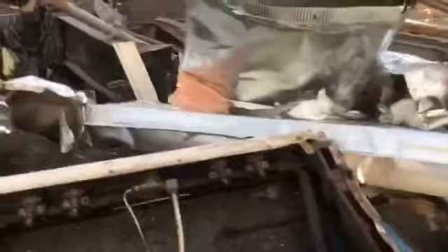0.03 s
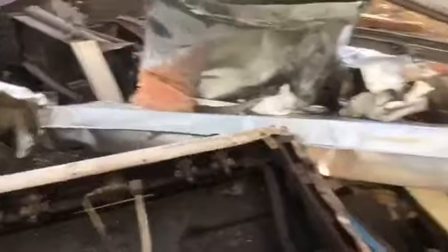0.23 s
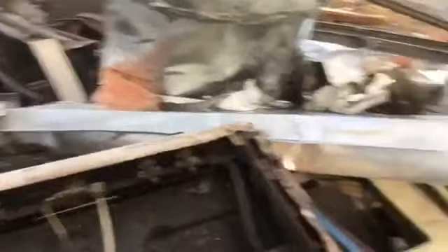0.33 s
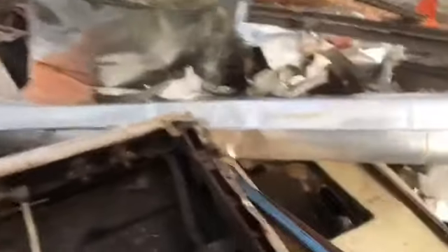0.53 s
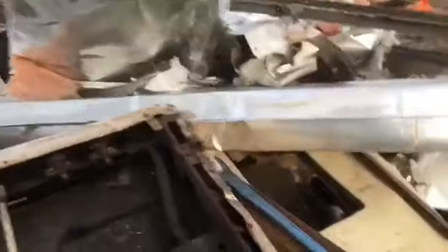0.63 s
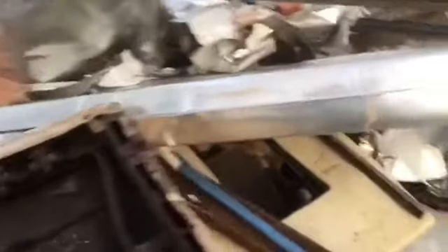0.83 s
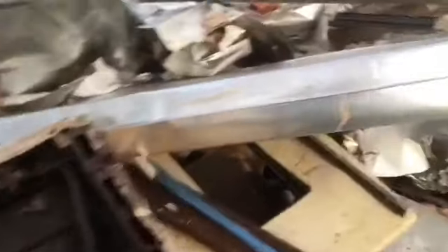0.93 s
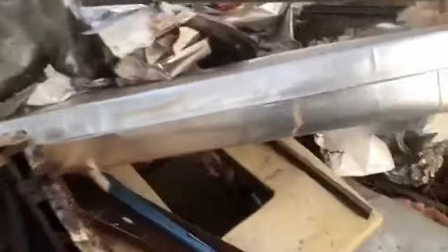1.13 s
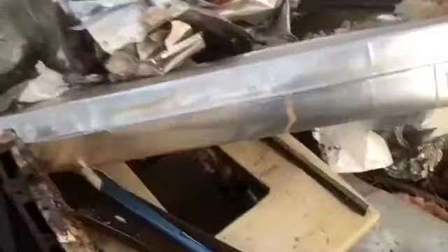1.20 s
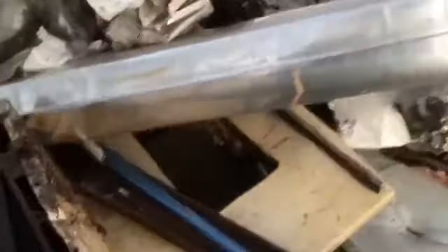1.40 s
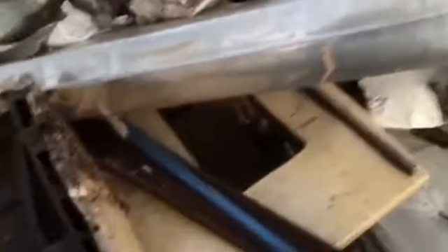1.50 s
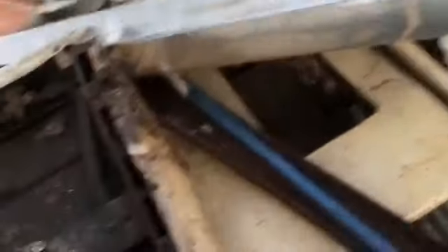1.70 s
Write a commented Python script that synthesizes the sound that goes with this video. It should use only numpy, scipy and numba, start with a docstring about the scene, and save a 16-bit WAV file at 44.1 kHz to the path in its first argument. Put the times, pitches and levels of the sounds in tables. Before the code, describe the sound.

Sheet-metal scrap hits a heap with a loud, hollow crash at about 0.2 seconds and bounces twice by 0.5. It slides with a quieter grinding scrape until 0.8, then clatters and thuds again, settling with faint ticks by 1.3 seconds. A slight yard echo follows the hits, over a low, distant machinery drone. From 1.4 seconds, wind gusts rumble on the microphone, joined by a very faint metal squeal.

```python
"""Sheet-metal scrap drops on a heap in an open yard: it lands, bounces twice, slides, clatters and settles.
Each impact excites the same hollow panel, whose free vibration is a sum of damped modes, a few strong
among many dense ones. Flexing adds dull thuds, small pieces tick, and stick-slip friction makes the
slide grind. The yard returns a diffuse echo. Underneath are the drone of distant machinery, a faint
squeal of metal and low gusts on the microphone."""
import sys
import numpy as np
from scipy import signal
from scipy.fft import rfft, irfft
from scipy.io import wavfile
from scipy.ndimage import uniform_filter1d
from numba import njit

SR = 44100
rng = np.random.default_rng(int(sys.argv[2]) if len(sys.argv) > 2 else 0)


def transcribe(u):
    """Save the signal u as a 16-bit wav file named by the first command-line argument.

    u: samples, shape (n,) or (channels, n), limited to [-1, 1]; the rate is SR.
    q: integer samples, one column per channel.
    """
    v = np.clip(np.atleast_2d(u).T, -1, 1)
    q = np.round(v * 32767).astype(np.int16)
    wavfile.write(sys.argv[1], SR, q)


N = 77175

# Impacts on the panel. Each row: start in seconds, level in dB, boom, clang, crack and sizzle in dB
# relative to the body, factor on the ring time, favoured frequency in Hz, its lift in dB.
BLOWS = [(.2245, 0, 1.5, 2.5, 2.5, -3, 0.85, 807, 10.5), (.243, -3, 4, 4.5, -1, 1.5, 1.17, 790, 4.5),
         (.369, -13.5, 5, 8, 9.5, 5.5, 0.84, 990, 0.5), (.402, -22, -14, 8.5, 12, -2, 0.64, 1400, 2),
         (.445, -10, 3.5, 8.5, 5.5, 0, 0.79, 608, 14), (.464, -6.5, 1, -3.5, -25, -7, 0.64, 1355, 7),
         (.828, -10, 3, 1, 11, 7, 1.05, 1410, 5), (0.851, -11, 6, 2.5, 5, 9, 0.56, 902, 8),
         (0.899, -15.5, -9, 3, -9, 4, 0.37, 890, -1), (0.9348, -3, -0.5, 7, 2, -9, 0.71, 1860, 1)]
BOOM_HZ, BODY_HZ, CLANG_HZ, CRACK_HZ, SIZZLE_HZ = 304, 863, 1970, 6500, 12000
# Strong modes of the panel. Each row: frequency in Hz, relative level in dB.
STRONG_MODES = [(192, -11.5), (243, -9), (272, -4.5), (296, -7), (313, 0), (338, -6), (385, -8),
                (412, -9.5), (662, -4), (785, -2), (818, -5.5), (908, 0.5), (1066, -12.5), (1158, -4),
                (1380, -3.5), (1575, -6.5), (1675, -6), (1752, -14), (1909, -10), (1995, -12),
                (3020, -15.5), (3950, -20)]
# Damping of the strong modes. Each row: frequency in Hz, nominal time to fall 60 dB in seconds.
STRONG_T60 = [(190, 0.55), (310, 0.35), (420, 0.35), (800, 0.18), (1400, 0.25), (2000, .22), (4000, 0.1)]
# Spectral envelope of the dense modes. Each row: frequency in Hz, relative level in dB.
DENSE_SPECTRUM = [(120, -9), (290, -0.5), (480, -5.5), (850, -3.5), (1700, -6), (2400, -17), (3300, -21),
                  (5000, -32), (8000, -35), (12000, -40.5), (16000, -57)]
# Damping of the dense modes. Each row: frequency in Hz, nominal time to fall 60 dB in seconds.
DENSE_T60 = [(200, 0.67), (800, 0.38), (2000, 0.26), (5000, 0.21), (14000, 0.13)]
# Spectrum of the contact noise. Each row: frequency in Hz, relative level in dB.
CONTACT_SPECTRUM = [(500, -1), (1800, 0), (4000, -5.5), (8000, -7.5), (16000, -26.5)]
STRONG_DB, DENSE_DB, CONTACT_DB = -15.5, -11.5, -29.5  # balance within a blow

# Knocks of the flexing panel. Each row: start in seconds, level in dB, pitch in Hz, T60 in seconds.
THUDS = [(0.243, -18, 81, 0.19), (0.276, -9.5, 283, 0.21), (.322, -11.5, 310.2, 0.16),
         (0.378, -27, 96, 0.12), (0.569, -27, 70, 0.037), (.668, -20.5, 56.3, .1), (.882, -8.5, 69.6, .11),
         (0.919, -5, 312.7, 0.064), (1.167, -18, 67.2, 0.095), (1.17, -23.5, 177, 0.097)]
# Touches of small pieces. Each row: start in seconds, level in dB.
TICKS = [(.305, -35), (0.337, -40.5), (.535, -48.5), (1.05, -48.5), (1.118, -54.5), (1.167, -51.5),
         (1.221, -56), (1.285, -58.5)]
# Spectrum of a tick. Each row: frequency in Hz, relative level in dB.
TICK_SPECTRUM = [(1000, 10), (3300, 5), (4000, 2.5), (5000, -4.5), (6200, 2), (7500, -10), (9000, -11),
                 (11500, -18), (15000, -34)]
# Course of the slide. Each row: time in seconds, level of the grind in dB, level of the rasp in dB.
SLIDE_LEVELS = [(.5, -35, -50.5), (.605, -34, -50.5), (.65, -36.5, -60), (.71, -35, -52.5),
                (0.749, -35.5, -46), (0.798, -37, -49), (.825, -45, -54)]
# Spectrum of the grind. Each row: frequency in Hz, relative level in dB.
GRIND_SPECTRUM = [(300, 8), (900, -1), (1500, 4.5), (2500, -10.5), (3900, -26), (5000, -26), (9000, -34),
                  (15000, -52)]
# Spectrum of the edge's rasp. Each row: frequency in Hz, relative level in dB.
RASP_SPECTRUM = [(500, -15), (2200, 1.5), (3000, -0.5), (3900, -2.5), (4900, -19), (9000, -35),
                 (15000, -52)]

# Reverberation of the yard. Each row: frequency in Hz, time to fall 60 dB in seconds.
YARD_T60 = [(100, 1.5), (330, 1.174), (600, 0.92), (1400, 0.37), (2500, 0.53), (6000, 0.34), (14000, 0.36)]
# Spectrum of the machinery. Each row: frequency in Hz, relative level in dB.
DRONE_SPECTRUM = [(22, -32), (50, 6), (110, 0.5), (250, -7.5), (500, -13.5), (1000, -15.5), (1700, -25),
                  (2500, -35.5), (4000, -48.5), (6000, -53), (15000, -60)]
# Course of the squeal. Each row: time in seconds, level in dB.
SQUEAL_LEVELS = [(0, -59.5), (.05, -67), (.12, -71), (1.5, -86), (1.66, -66.5), (1.72, -60.5), (1.75, -61)]
# Resonances of the squealing metal. Each row: frequency in Hz, relative level in dB.
SQUEAL_SPECTRUM = [(1000, -30), (2150, -1), (2320, 6.5), (2500, -10), (2850, -1), (3020, 4), (3250, -23),
                   (5000, -29.5), (12000, -52)]
# Course of the gusts. Each row: time in seconds, level in dB.
GUST_LEVELS = [(0, -40), (.3, -38), (.65, -33.5), (.8, -39), (1.0, -29.5), (1.12, -55), (1.38, -63),
               (1.445, -21), (1.48, -33.5), (1.53, -28), (1.58, -48.5), (1.66, -26.5), (1.7, -31),
               (1.75, -19.5)]
# Spectrum of the gusts. Each row: frequency in Hz, relative level in dB.
GUST_SPECTRUM = [(20, -26), (38, -15.5), (55, -7.5), (85, -8), (140, -15), (260, -50), (800, -45),
                 (3000, -81)]


def panel(dense_count=640, spread_s=0.0021, band_ratio=1.096):
    """Impact excitation: a contact crack and free vibration, coloured by where and how hard it hits."""
    out = np.zeros(N)
    strong_hz, strong_db = np.array(STRONG_MODES, float).T
    place = (np.arange(dense_count) + rng.random(dense_count)) / dense_count
    dense_hz = 120 + 5000 * place + 11000 * place ** 3
    dense_gain = undb(at(DENSE_SPECTRUM, dense_hz)) * np.sqrt(np.gradient(dense_hz))
    dense_gain *= undb(DENSE_DB) / np.sqrt(np.sum(dense_gain ** 2) / 2)
    build = rise(spread_s)  # bending waves take a moment to spread through the sheet
    for start, level_db, boom, clang, crack, sizzle, length, favoured_hz, lift_db in BLOWS:
        strong = strike(strong_hz, undb(strong_db + STRONG_DB), at(STRONG_T60, strong_hz) * length)
        dense = strike(dense_hz, dense_gain, at(DENSE_T60, dense_hz) * length)
        band = [(favoured_hz / band_ratio, 0), (favoured_hz, lift_db), (favoured_hz * band_ratio, 0)]
        sheet = build * colour(strong + dense, band)
        contact = undb(CONTACT_DB) * noise(CONTACT_SPECTRUM) * fade(t60=0.047)
        tone = [(BOOM_HZ, boom), (BODY_HZ, 0), (CLANG_HZ, clang),
                (CRACK_HZ, crack), (SIZZLE_HZ, sizzle)]
        add(out, start, undb(level_db) * colour(sheet + contact, tone))
    return out


def strike(hz, gain, t60, detune=0.00701, scatter_db=1.5):
    """Modal response: a random striking point weights the modes, and changing support detunes them."""
    shift, scatter = rng.standard_normal((2, len(hz)))
    tuned_hz = hz * (1 + detune * shift)
    poles = np.exp((2j * np.pi * tuned_hz - np.log(1000) / t60) / SR)
    phases = np.exp(2j * np.pi * rng.random(len(hz)))
    return ring(poles, gain * undb(scatter_db * scatter) * phases, N)


@njit
def ring(poles, weights, count):
    """Superposition: damped sinusoids add, each followed until it has fallen about 70 dB."""
    out = np.zeros(count)
    for k in range(len(poles)):
        phasor, pole = weights[k], poles[k]
        for i in range(min(count, int(-8 / np.log(abs(pole))))):
            out[i] += phasor.imag
            phasor *= pole
    return out


def thuds():
    """Damped oscillation: each flexure of the panel sounds one low, quickly dying sinusoid."""
    out, t = np.zeros(N), np.arange(N) / SR
    for start, db, hz, t60 in THUDS:
        add(out, start, undb(db) * np.sin(2 * np.pi * hz * t) * fade(t60) * rise(tau_s=0.004))
    return out


def ticks():
    """Brief contacts have broad spectra: small settling pieces give bright bursts of noise."""
    out = np.zeros(N)
    for start, db in TICKS:
        add(out, start, undb(db) * noise(TICK_SPECTRUM) * fade(t60=0.14))
    return out


def slide(slips_per_s=790, scatter_db=3, slip_t60_s=0.043):
    """Stick-slip friction: an edge drags over the heap in dense bursts, rasping more before it drops."""
    t = np.arange(N) / SR
    slips = (rng.random(N) < slips_per_s / SR) * undb(scatter_db * rng.standard_normal(N))
    bursts = signal.fftconvolve(slips, fade(slip_t60_s))[:N]
    grit = unit(uniform_filter1d(bursts, size=64))
    rows = np.array(SLIDE_LEVELS)
    touching = uniform_filter1d(1. * ((t > rows[0, 0]) & (t < rows[-1, 0])), size=400)
    grind = noise(GRIND_SPECTRUM) * curve(rows[:, [0, 1]])
    rasp = noise(RASP_SPECTRUM) * curve(rows[:, [0, 2]])
    return grit * touching * (grind + rasp)


def yard(x, echo_db=-15, onset_s=0.023):
    """Reverberation: heaps and walls return a diffuse echo in which the bass outlasts the treble."""
    spectrum = rfft(rng.standard_normal(N))
    octave = np.log2(np.maximum(np.arange(len(spectrum)) * SR / N, 1))
    tail = np.zeros(N)
    for k in range(6, 15):  # octave bands from 64 Hz upward
        band = irfft(spectrum * np.maximum(1 - abs(octave - k), 0), N)
        tail += band * fade(at(YARD_T60, 2. ** k))
    tail *= rise(onset_s)
    return undb(echo_db) * signal.fftconvolve(x, tail / np.sqrt(np.sum(tail ** 2)))[:N]


def machinery(level_db=-41.5):
    """Stationary noise: distant machines merge into a low drone."""
    return undb(level_db) * noise(DRONE_SPECTRUM)


def squeal():
    """Resonance: far-off metal squeals faintly in two narrow bands of noise."""
    return curve(SQUEAL_LEVELS) * noise(SQUEAL_SPECTRUM)


def gusts():
    """Turbulence: the fluctuating pressure of wind on the microphone gives a low rumble."""
    return curve(GUST_LEVELS) * noise(GUST_SPECTRUM)


def undb(db):
    """Amplitude ratio of a level in decibels."""
    return 10 ** (np.asarray(db) / 20)


def at(points, hz):
    """Interpolation of (Hz, value) points on a logarithmic frequency axis."""
    freqs, values = np.array(points, float).T
    return np.interp(np.log(np.maximum(hz, 1)), np.log(freqs), values)


def curve(points):
    """Amplitude envelope through (seconds, dB) points."""
    return undb(np.interp(np.arange(N) / SR, *np.array(points, float).T))


def colour(x, points, size=2 ** 13):
    """Minimum-phase filtering: folding the cepstrum makes the (Hz, dB) response causal."""
    hz = np.arange(size // 2 + 1) * SR / size
    cepstrum = irfft(np.log(undb(at(points, hz))))
    cepstrum[1:size // 2] *= 2
    cepstrum[size // 2 + 1:] = 0
    return signal.fftconvolve(x, irfft(np.exp(rfft(cepstrum))))[:len(x)]


def unit(x):
    """Normalisation to an rms of 1."""
    return x / np.sqrt(np.mean(x ** 2))


def noise(points):
    """Spectral shaping: white noise takes on a (Hz, dB) spectrum, at an rms of 1."""
    spectrum = rfft(rng.standard_normal(N))
    hz = np.arange(len(spectrum)) * SR / N
    return unit(irfft(spectrum * undb(at(points, hz)), N))


def rise(tau_s):
    """Exponential approach to 1 with time constant tau_s."""
    return 1 - np.exp(-np.arange(N) / SR / tau_s)


def fade(t60):
    """Exponential decay by 60 dB in t60 seconds."""
    return np.exp(-np.log(1000) * np.arange(N) / SR / t60)


def add(out, start, x):
    """Delayed superposition: x joins out at start seconds."""
    i = int(start * SR)
    out[i:] += x[:N - i]


def scene():
    """Sound pressures add: the scrap, its echo and the background meet in one channel."""
    scrap = panel() + thuds() + ticks() + slide()
    return (scrap + yard(scrap) + machinery() + squeal() + gusts())[None]


def record(dry, top_hz=16200):
    """Saturation and band limiting: the microphone rounds the loudest peaks and cuts the top."""
    rounded = dry / (1 + dry ** 8) ** (1 / 8)
    return signal.sosfilt(signal.ellip(8, .2, 70, top_hz, fs=SR, output="sos"), rounded)


dry = scene()
out = record(dry)
transcribe(out)
```